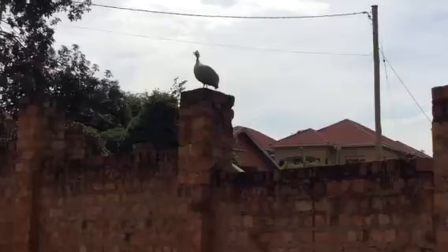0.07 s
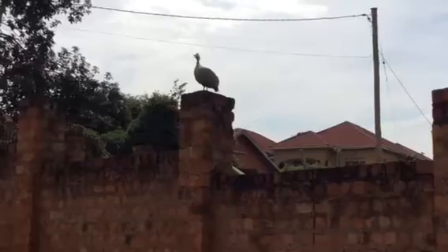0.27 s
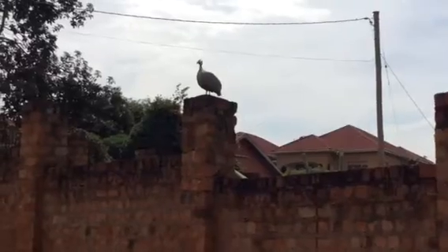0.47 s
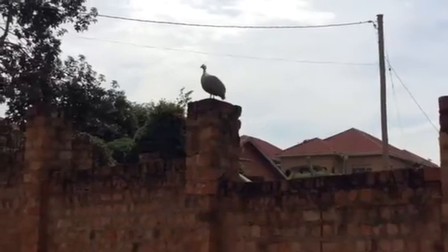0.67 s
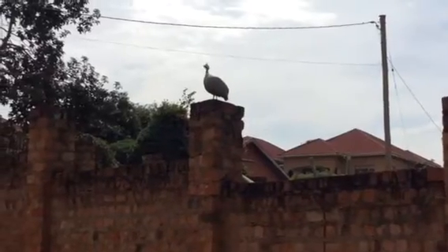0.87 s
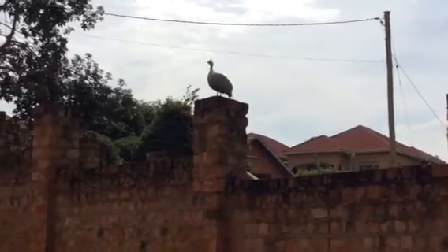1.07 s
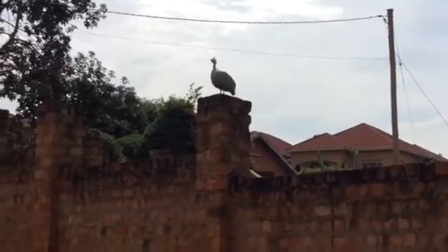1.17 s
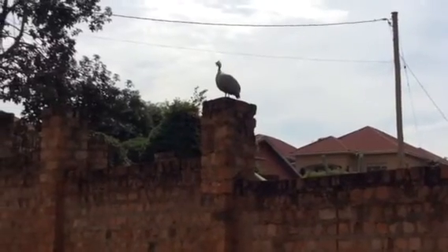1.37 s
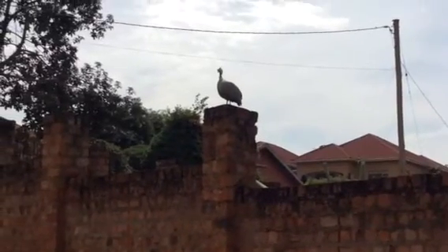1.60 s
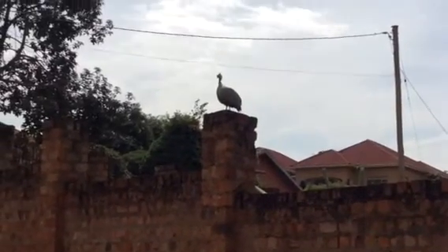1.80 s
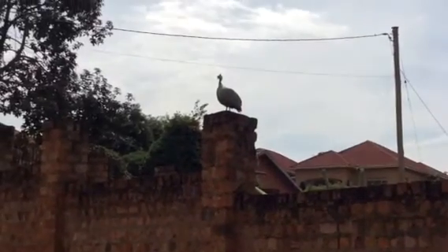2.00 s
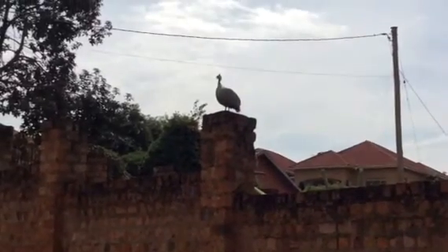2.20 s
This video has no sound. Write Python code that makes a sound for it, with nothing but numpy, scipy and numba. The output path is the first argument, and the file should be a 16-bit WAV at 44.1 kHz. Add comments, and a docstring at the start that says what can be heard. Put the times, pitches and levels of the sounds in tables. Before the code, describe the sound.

Harsh, buzzing guinea fowl calls repeat evenly outdoors in a residential area, reflecting off brick walls; the last are duller. Quiet low rumble, faint handling ticks, and far soft coos and a songbird's twitter follow.

```python
"""Seven short harsh calls from a guinea fowl on a brick pillar some metres from the microphone, echoed by walls
and houses. Each is a rough pulse train, mostly rising in pitch, that rings moving throat resonances.
Town rumble made of noise bands lies underneath; the hand on the recorder gives a few faint ticks.
Later a far dove coos in wavering tones and a songbird twitters in quick falling ones.
The sound opens abruptly, just inside the first call."""
import sys
import numpy as np
from scipy import signal
from scipy.fft import irfft
from scipy.io import wavfile
from scipy.ndimage import uniform_filter1d
from numba import njit

SR = 44100
rng = np.random.default_rng(int(sys.argv[2]) if len(sys.argv) > 2 else 0)


def pcm_store(signal):
    """Save signal as 16-bit PCM."""
    levels = np.round(np.clip(np.atleast_2d(signal), -1, 1) * 32767)
    wavfile.write(sys.argv[1], SR, levels.astype(np.int16).T)


def ratio_of_db(decibels):
    """Turn decibels (scalar or array-like) into linear amplitude factors; 0 dB maps to 1."""
    return 10 ** (np.asarray(decibels, float) / 20)


N = 99225  # samples, 2.25 s


@njit
def svf(x, hz, width):
    """State-variable band-pass with a moving centre, gain 1 there."""
    y, band, low = np.empty(len(x)), 0., 0.
    for i in range(len(x)):
        g, damping = np.tan(np.pi * hz[i] / SR), width / hz[i]
        v = (band + g * (x[i] - low)) / (1 + g * (g + damping))
        band, low, y[i] = 2 * v - band, low + 2 * g * v, damping * v
    return y


def level(x, db):
    """Scale to an rms level."""
    return x * ratio_of_db(db) / np.sqrt(np.mean(x ** 2))


def walk(rate, size=N):
    """Random levels held 1 / rate s and slewed twice; spread near 1."""
    k = int(SR / rate)
    steps = np.repeat(rng.standard_normal(size // k + 1), k)
    return 1.3 * uniform_filter1d(uniform_filter1d(steps, k), k)[:size]


# Density of the distant town at points along the spectrum, before the whole is scaled to TOWN_DB
# columns: pitch_hz [Hz], level_db [dB per Hz]
TOWN_SPECTRUM = [(22, -22), (45, -4), (92, -1.5), (200, -6), (416, -8.5), (800, -14.5), (1450, -15.5),
                 (3000, -22), (5000, -19), (7500, -24.5), (11000, -27.5), (13500, -29.5), (15500, -38)]
TOWN_DB = -66  # rms
SWELL_DB, SWELL_TOP_HZ, FLICKER_DB = 1.5, 500, 1.3  # the swell's dB is halved at SWELL_TOP_HZ


def town():
    """Third-octave bands of distant traffic and leaves; the bass swells together, each band flickers alone."""
    out, swell = 0, walk(2.05)
    table_hz, table_db = np.array(TOWN_SPECTRUM).T
    for hz in 25 * 2 ** np.arange(0, 9.4, 1 / 3):
        centre = np.full(N, hz)
        band = svf(svf(rng.standard_normal(N), centre, hz / 3), centre, hz / 3)
        db = np.interp(np.log(hz), np.log(table_hz), table_db)
        db = db + SWELL_DB * swell / (1 + hz / SWELL_TOP_HZ)
        out = out + ratio_of_db(db + FLICKER_DB * walk(12.01)) * band
    return level(out, TOWN_DB)


JITTER, SHIMMER_DB = .015, 2.2  # spread of pulse spacing (share of a cycle) and of pulse level
RASP_DB, RASP_SHARE = -8, .4  # level against the pulses; decay as a share of the cycle


def rough_voice(t, when, pitch_hz, breath):
    """Uneven pulses, each followed by breath noise that dies away within the cycle."""
    chance = rng.standard_normal((64, 2)).T
    turns = np.cumsum(np.interp(t, when, pitch_hz)) / SR
    marks = np.cumsum(1 + JITTER * chance[0])
    pulse_s = np.interp(marks[marks < turns[-1]], turns, t)
    # pulses are summed as spectra so that they can fall between samples
    hz = np.arange(len(t) // 2 + 1) * SR / len(t)
    spectrum = np.exp(-2j * np.pi * hz[:, None] * pulse_s) @ ratio_of_db(SHIMMER_DB * chance[1][:len(pulse_s)])
    pulses = irfft(spectrum, len(t))
    phase = np.interp(t, pulse_s, np.arange(len(pulse_s))) % 1
    rasp = np.exp(-phase / RASP_SHARE) * breath
    return level(pulses, 0) + level(rasp, RASP_DB)


# Resonances of the throat, each gliding from its first centre to its settled one
# columns: start_hz [Hz], settled_hz [Hz], settle_s [s], width_hz [Hz, each of two passes],
# level_db [dB], treble_share [share of head-turn dB], gape_share [share of gape dB]
THROAT_RESONANCES = [(325, 337, .03, 110, -21, 0, -0.81), (990, 1094, 0.026, 177, -12.5, 0, -0.82),
                     (1326, 1454, 0.049, 245, -12, 0.16, -0.67), (2064, 1706, 0.03, 560, 4, 0.047, -0.34),
                     (2470, 2440, 0.015, 510, -11, 0.085, -1), (3180, 3630, 0.011, 400, -13.5, 1.15, -2.1),
                     (3406, 4192, 0.017, 510, 3, 0.61, -0.028), (3860, 4840, 0.025, 630, 5.5, 1.4, 0.33),
                     (5000, 5300, 0.019, 305, -7.5, 1.5, 0.94), (6150, 6310, 0.024, 870, -8.5, 1.85, 0.95),
                     (8500, 9150, 0.034, 3770, -11, 1.22, 0.37),
                     (12600, 11170, 0.025, 1170, -22.5, 0.34, 0.26)]
# Dips from side pockets of the throat
# columns: pitch_hz [Hz], width_hz [Hz]
THROAT_DIPS = [(5850, 340), (7450, 200)]
DRIFT_DB = 1.7
HISS_AT_10KHZ_DB = 3  # steady breath noise that rules the top of the voice


def throat(t, voice, breath, treble_db, gape):
    """Parallel moving resonances ring to voice and hiss; narrow dips are cut from their sum."""
    out = 0
    for start_hz, settled_hz, settle_s, width_hz, level_db, treble_share, gape_share in THROAT_RESONANCES:
        centre = settled_hz + (start_hz - settled_hz) * np.exp(-t / settle_s)
        source = voice + ratio_of_db(HISS_AT_10KHZ_DB) * (start_hz / 10000) ** 2 * breath
        ring = svf(svf(source, centre, 1. * width_hz), centre, 1. * width_hz)
        ring = level(ring, level_db + treble_share * treble_db)
        out = out + ring * ratio_of_db(gape_share * gape + DRIFT_DB * walk(64.4, size=len(t)))
    for dip_hz, width_hz in THROAT_DIPS:
        out = out - svf(out, np.full(len(t), 1. * dip_hz), 1. * width_hz)
    return out


EDGE_S = 0.0019  # linear rise; time constant of the fall


def call(rows, treble_db, gape_db):
    """A rough voice rings the throat; the beak gapes widest mid-call."""
    when, db, pitch_hz = (np.array(rows) - [rows[0][0], 0, 0]).T
    t = np.arange(SR // 8) / SR
    breath = rng.standard_normal((2, len(t)))
    voice = rough_voice(t, when, pitch_hz, breath[0])
    along = np.clip(t / when[-1], 0, 1)
    gape = gape_db * (2 * np.sin(np.pi * along) - 1)
    out = throat(t, voice, breath[1], treble_db, gape)
    edges = np.clip(t / EDGE_S, 0, 1) * np.exp(-np.clip(t - when[-1], 0, 1) / EDGE_S)
    return level(out, 0) * ratio_of_db(np.interp(t, when, db)) * edges


SCATTER_DB, SCATTER_T60_S = -8.5, 0.45


def scatter(dry):
    """Dense close reflections off brick and leaves: a decaying noise tail."""
    t = np.arange(SR // 2) / SR
    tail = rng.standard_normal(len(t)) * ratio_of_db(-60 * t / SCATTER_T60_S) * np.clip(t / 0.0057, 0, 1)
    return ratio_of_db(SCATTER_DB) * signal.fftconvolve(dry, tail / np.sqrt(np.sum(tail ** 2)))[:N]


@njit
def walls(x, lags, gain, damp):
    """Eight delay lines that feed each other, duller on every round."""
    line, soft, out = np.zeros((8, 8192)), np.zeros(8), np.zeros(len(x))
    for i in range(len(x)):
        total = 0.
        for k in range(8):
            soft[k] += (1 - damp) * (gain[k] * line[k, (i - lags[k]) & 8191] - soft[k])
            total += soft[k]
            out[i] += soft[k] * (1 - 2 * (k % 2))
        for k in range(8):
            line[k, i & 8191] = x[i] + soft[k] - total / 4
    return out


YARD_DB, YARD_T60_S, YARD_DAMP = -23.5, 0.85, 0.1  # T60 before damping; damp is a one-pole share


def yard(dry):
    """The wash of the yard, sound passed round between its walls."""
    lags = np.array([709, 967, 1237, 1523, 1861, 2203, 2609, 3049])  # samples
    # the tiny offset keeps the silent delay lines from slow denormal numbers
    return ratio_of_db(YARD_DB) * walls(dry + 1e-18, lags, ratio_of_db(-60 * lags / SR / YARD_T60_S), YARD_DAMP)


# Level and pitch contour of each call of the fowl, one list per call
# columns: time_s [s], level_db [dB rms], pitch_hz [Hz]
CALL_CONTOURS = [
    [(0.118, -46, 330.9), (0.126, -41, 350.5), (0.158, -39, 359.9), (0.19, -52.5, 372.8)],
    [(0.39, -63, 330), (0.398, -44, 329.8), (0.408, -43, 356.6), (0.422, -41.5, 344.9),
     (0.43, -38.5, 364.9), (0.475, -49.5, 360.5)],
    [(0.675, -67, 332.5), (0.685, -39.5, 321.6), (0.707, -40.5, 335), (0.715, -40, 356.1),
     (0.729, -44.5, 362.4), (0.745, -52.5, 368)],
    [(0.944, -69, 327.2), (0.952, -42, 334.3), (0.982, -40.5, 355), (0.988, -41, 372.2),
     (1.0, -46.5, 352.6), (1.02, -60.5, 368.7)],
    [(1.176, -58, 345.7), (1.184, -48.5, 329), (1.196, -36, 359.4), (1.22, -45, 365.5), (1.242, -48, 361.8),
     (1.255, -51.5, 336.9)],
    [(1.468, -63.5, 320.9), (1.482, -43, 342.8), (1.496, -44, 343.8), (1.502, -41.5, 353.2),
     (1.52, -50.5, 359.7), (1.54, -59.5, 360)],
    [(1.733, -66, 331), (1.741, -43, 329.8), (1.759, -38.5, 331.8), (1.767, -39.5, 348.3),
     (1.791, -44.5, 364), (1.81, -75, 374)],
]
# How the head turns and the beak opens, one row per call
# columns: treble_db [dB], gape_db [dB, how much the opening beak changes the colour]
HEAD_TURNS = [(1, 4), (1, 4.5), (-0.5, 8.5), (0.5, 5), (-1, 3.5), (-6, 5.5), (-7.5, 12)]
# Echoes off the nearest walls and ground
# columns: delay_s [s], level_db [dB]
NEAR_ECHOES = [(.0043, -23), (.011, -8.5), (0.029, -19), (0.064, -17), (0.107, -21)]


def fowl():
    """All calls, with near echoes, dense scatter and the wash of the yard."""
    dry = np.zeros(N)
    for rows, head in zip(CALL_CONTOURS, HEAD_TURNS):
        sound, i = call(rows, *head), int(rows[0][0] * SR)
        dry[i:i + len(sound)] += sound
    echoes = sum(ratio_of_db(db) * np.roll(dry, int(delay_s * SR)) for delay_s, db in NEAR_ECHOES)
    return dry + echoes + scatter(dry) + yard(dry)


# Ticks of the hand on the recorder
# columns: time_s [s], level_db [dB peak], pitch_hz [Hz, centre]
HAND_TICKS = [(.58, -48.5, 156), (1.102, -48.5, 497.5), (1.103, -51.5, 12900), (2.086, -55.5, 89)]


def handling(t):
    """Short taps on the recorder's case: cosines under a bell that is briefer at higher pitch."""
    out = 0
    for time_s, db, hz in HAND_TICKS:
        bell = np.exp(-((t - time_s) * hz * 3.1) ** 2)
        out = out + ratio_of_db(db) * bell * np.cos(2 * np.pi * hz * (t - time_s))
    return out


# Coos of the far dove
# columns: start_s [s], length_s [s], pitch_hz [Hz], level_db [dB rms]
DOVE_COOS = [(1.424, 0.25, 565, -72), (1.68, 0.095, 543, -73.5), (1.79, .1, 540, -71),
             (2.043, 0.061, 518, -71), (2.182, 0.066, 522, -74.5)]
COO_WAVER_DB = 1.5


def dove(t):
    """Soft, nearly pure coos that waver with distance."""
    out = 0
    for start_s, length_s, pitch_hz, db in DOVE_COOS:
        shape = np.sin(np.pi * np.clip((t - start_s) / length_s, 0, 1)) ** 0.2
        loudness = ratio_of_db(db + COO_WAVER_DB * walk(26.2))
        hz = pitch_hz * (1 + 0.0049 * walk(17))
        out = out + loudness * shape * np.sin(2 * np.pi * np.cumsum(hz) / SR)
    return np.sqrt(2) * out  # sine peak for an rms level


TWITTER_S, TWITTER_NOTES, TWITTER_PER_S = 1.895, 5, 33  # start, count, notes per second
TWITTER_HZ, TWITTER_FALL_HZ, TWITTER_DB = 5500, 400, -70  # start and fall of each note, peak level


def songbird(t):
    """A faint, fast run of falling notes far off."""
    note = (t - TWITTER_S) * TWITTER_PER_S
    sounding = (note > 0) * (note < TWITTER_NOTES)
    beat = np.sin(np.pi * note) ** 2 * sounding * ratio_of_db(2.5 * walk(300))
    hz = TWITTER_HZ - TWITTER_FALL_HZ * (note % 1) + 110 * walk(400)
    return ratio_of_db(TWITTER_DB) * beat * np.sin(2 * np.pi * np.cumsum(hz) / SR)


def scene():
    """Town, fowl, taps, dove and songbird at one microphone."""
    t = np.arange(N) / SR
    return (town() + fowl() + handling(t) + dove(t) + songbird(t))[None]


def low_pass(x):
    """Removes everything above the highest recorded frequency."""
    return signal.sosfilt(signal.butter(12, 15670, fs=SR, output="sos"), x)


OPEN_S = .1203


def record(dry):
    """The recorder opens abruptly: silence, then a ramp of 0.39 ms."""
    opening = np.clip((np.arange(N) / SR - OPEN_S) / 0.00039, 0, 1)
    return low_pass(dry * opening)


dry = scene()
out = record(dry)
pcm_store(out)
```